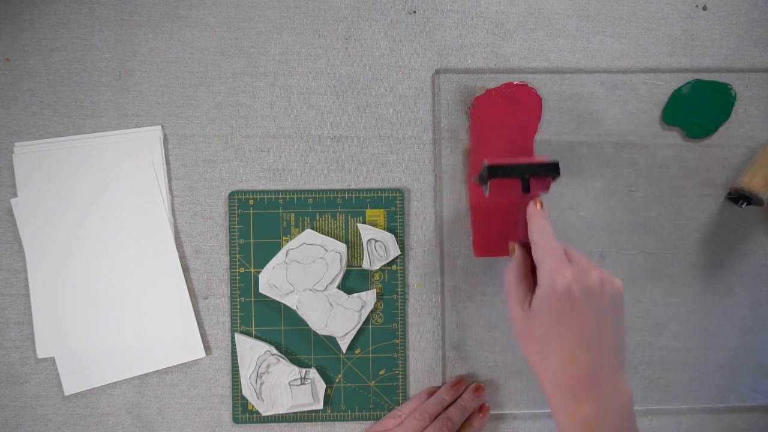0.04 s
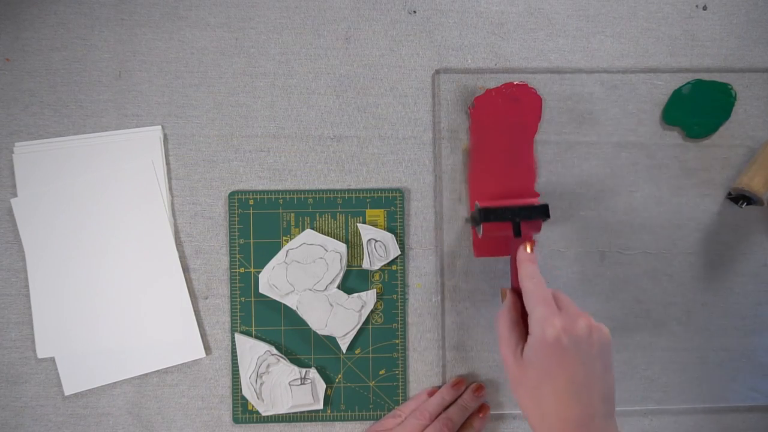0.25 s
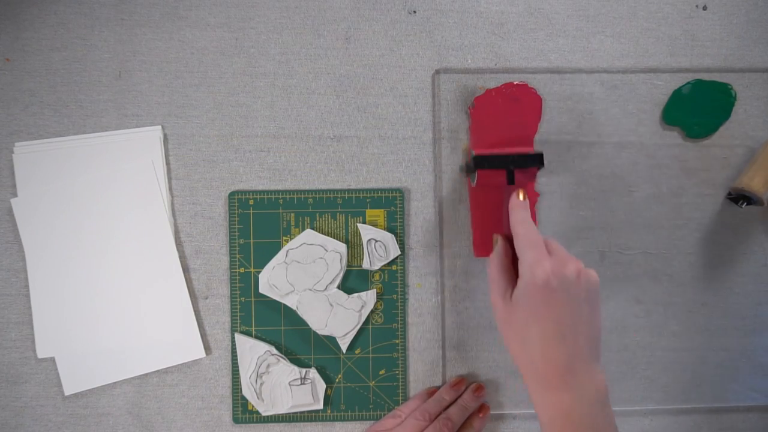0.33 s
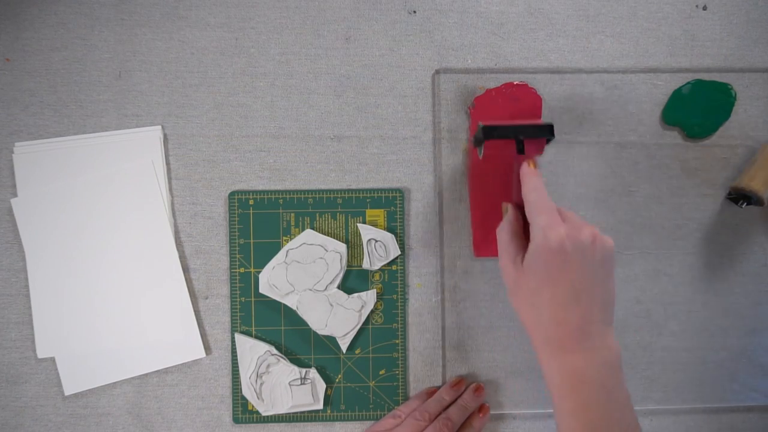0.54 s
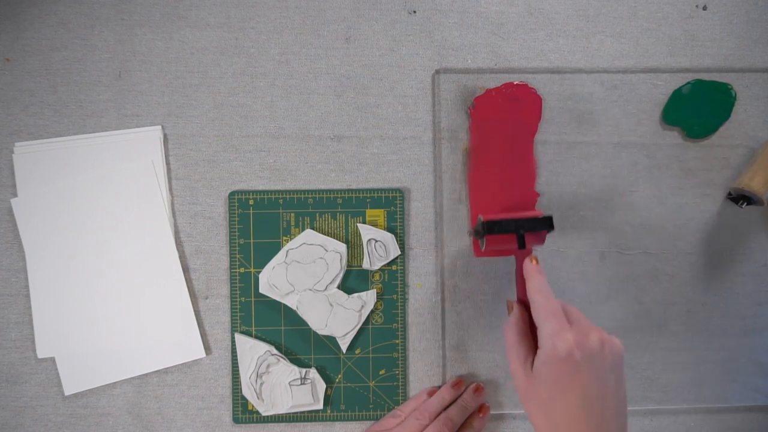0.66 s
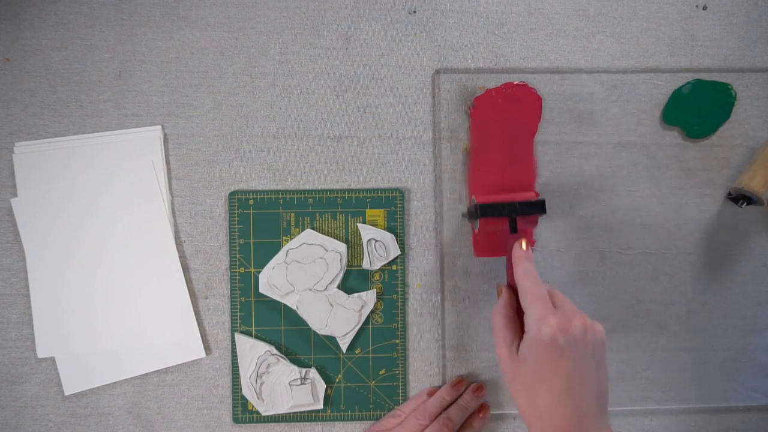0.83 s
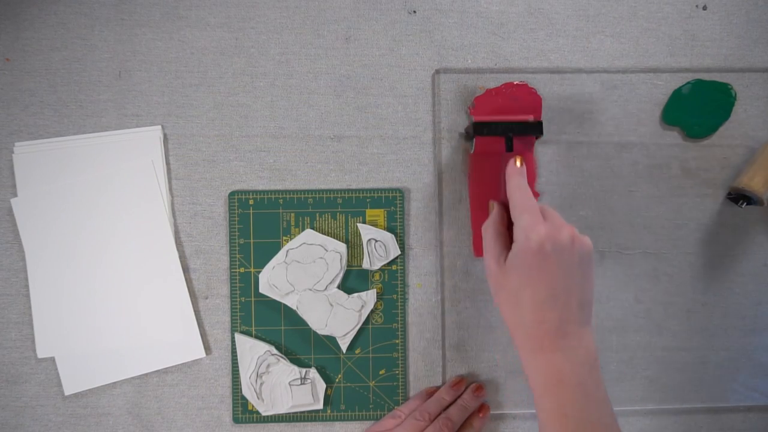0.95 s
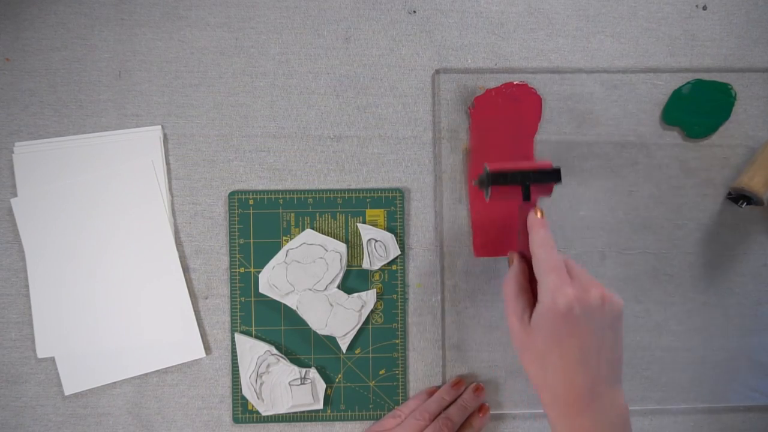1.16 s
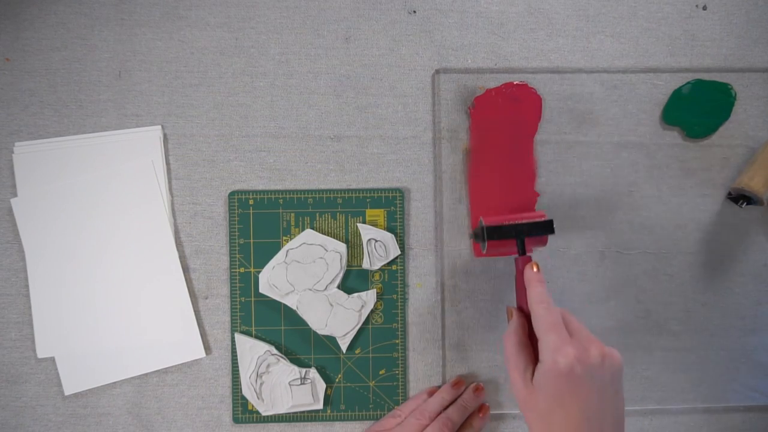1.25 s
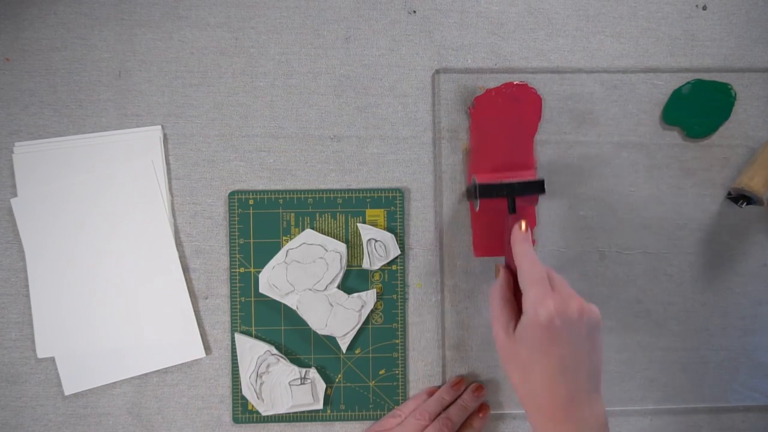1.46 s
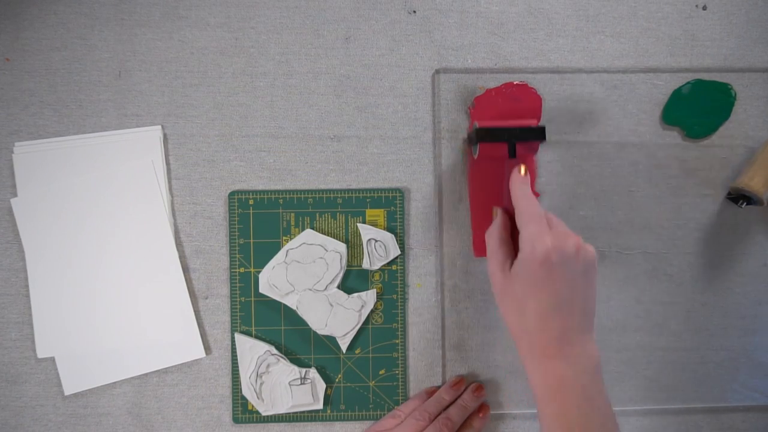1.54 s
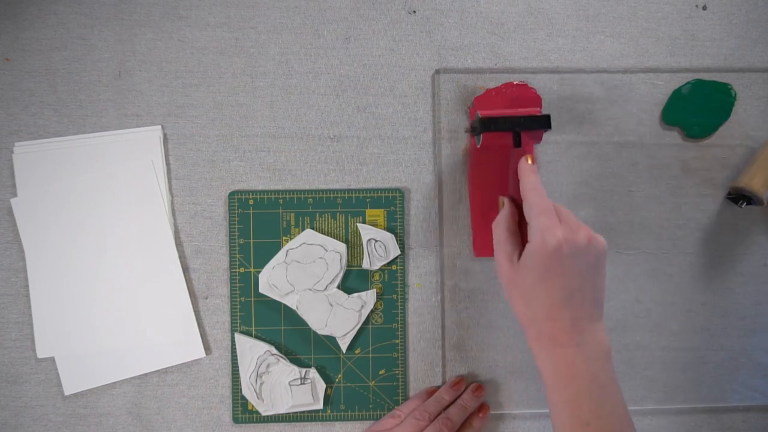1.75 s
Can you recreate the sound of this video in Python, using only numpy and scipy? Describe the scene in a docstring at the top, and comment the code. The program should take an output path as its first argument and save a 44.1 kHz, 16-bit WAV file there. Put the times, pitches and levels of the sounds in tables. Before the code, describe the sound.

An ink roller strikes a smooth slab with loud, bright clacks and short hollow thumps at about 0.2, 0.75 and 1.36 seconds, the first heaviest. After each, a quiet sticky hiss with low rumble swells, peaking near 0.4, 1.0 and 1.6, then stops, with small axle ticks at lift-off. Faint swishes precede landings, a tiny squeak near 1.2. Close, small room, short reverberation, low background noise.

```python
"""A rubber hand roller spreads sticky ink on a slab lying on a table, three strokes in a small room.
Over the quiet noise floor the arm swings back with a faint swish (filtered noise), once with a soft squeak.
Each landing thumps the slab (damped modes), and the axle clacks in its frame just after (a noise burst).
The ink then hisses as the roller is pushed along (random snaps) over a low rumble, and the loose axle
ticks, mostly as the roller lifts off."""
import sys
import numpy as np
from scipy import signal
from scipy.fft import rfft, irfft, next_fast_len
from scipy.io import wavfile
from scipy.ndimage import uniform_filter1d

SR = 44100
rng = np.random.default_rng(int(sys.argv[2]) if len(sys.argv) > 2 else 0)


def transcribe(u):
    """Save the signal u as a 16-bit wav file named by the first command-line argument.

    u: samples, shape (n,) or (channels, n), limited to [-1, 1]; the rate is SR.
    q: integer samples, one column per channel.
    """
    v = np.clip(np.atleast_2d(u).T, -1, 1)
    q = np.round(v * 32767).astype(np.int16)
    wavfile.write(sys.argv[1], SR, q)


N = 79380
RING_T = np.arange(SR // 2) / SR  # time since a blow (s)

# spectrum of the background noise: frequency_hz, level_db
FLOOR_COLOUR = [(20, -4.5), (35, -8.5), (52, -1), (66, -17.5), (85, -10), (115, -13.5), (170, -15.5),
                (220, -14.5), (265, -7.5), (320, -18), (600, -22.5), (950, -25), (1800, -32), (3400, -37.5),
                (6700, -40), (15500, -51.5)]
FLOOR_DB = -49

# swings of the arm back: centre_s, half_length_s, level_db
RETURNS = [(0.125, 0.037, -60), (.675, 0.042, -60), (1.25, 0.044, -56.5)]
# spectrum of the swish: frequency_hz, level_db
SWISH_COLOUR = [(300, -18.5), (1400, 2), (2400, -1.5), (3400, -4), (5000, -5), (8500, -15), (15000, -17)]
SQUEAK_S, SQUEAK_HALF_S, SQUEAK_HZ, SQUEAK_WIDTH_HZ, SQUEAK_DB = 1.222, 0.0089, 3360, 120, -53

# the roller lands: start_s, thump_db, contact_brightness_hz, hollow_ring_db, slap_db, axle_lag_s,
# clack_db, rattle_length_s, frame_ring_db, clack_midrange_db, handle_knock_db, clack_brightness_hz
LANDINGS = [(.2020, -5.5, 750, -6.5, -12, .0016, -8, 0.0023, 4.5, -4.5, 0.5, 16000),
            (0.754, -11, 700, -14, -24.5, 0.0013, -9.5, 0.004, -18.5, 9, 1, 16500),
            (1.3646, -11, 540, 5.5, -28.5, .0025, -8, 0.0019, -3, -9, -1.5, 13200)]
# modes of slab and table: frequency_hz, level_db, t60_s
SLAB_MODES = [(84.8, -17.5, 0.56), (103.2, -20, 0.37), (138.1, -15.5, .24), (170.3, -8, 0.18),
              (203.7, -13.5, .24), (261, -30.5, 0.25), (390, -17, .15), (426.4, -13.5, 0.22),
              (480, -26, 0.32), (550, -20.5, 0.18), (630, -23.5, 0.23), (641, -26.5, 0.42)]
# modes that ring more or less with the landing spot: frequency_hz, level_db, t60_s
HOLLOW_MODES = [(257.6, -17.5, 0.26), (304.7, -15, .28), (344, -8.5, .13), (360, -4.5, .12),
                (774, -27, 0.23), (835, -28.5, 0.25)]
# modes of rubber meeting ink: frequency_hz, level_db, t60_s
SLAP_MODES = [(466, 2.5, 0.025), (944, -12.5, 0.0089)]
HEAVE_HZ, HEAVE_DB, HEAVE_T60_S = 250, 2, 0.012  # the first, quickly damped heave of the slab
SLAB_BUILD_S = 0.0019  # time constant with which the slab's ringing builds up
PULSE_SIZE = 2048  # length of the short sounds (samples)

# modes of the roller frame: frequency_hz, level_db, t60_s
FRAME_MODES = [(4790, -30.5, .03), (5170, -16.5, .018), (5790, -8, .015), (8060, -7, 0.0098),
               (8303, -3, 0.016)]
# modes of the handle's hollow knock: frequency_hz, level_db, t60_s
HANDLE_MODES = [(1380, -21.5, 0.035), (1513, -9, 0.031), (1861, -14.5, 0.026)]
# spectrum of the clack: frequency_hz, level_db
CLACK_COLOUR = [(200, -13), (1080, -22.5), (1500, -1), (2400, -5.5), (3700, -7.5), (5300, 3), (7100, -4.5),
                (8300, 4.5), (10000, -6), (14500, -7), (16500, -3.5)]
CHATTER_T60_S, MIDRANGE_HZ, MIDRANGE_WIDTH_HZ = 0.0071, 3700, 590

# pushes through the ink: start_s, fastest_s, end_s
PUSHES = [(.31, .425, .484), (.88, 1.015, 1.055), (1.50, 1.615, 1.657)]
# spectrum of the ink hiss: frequency_hz, level_db
INK_COLOUR = [(300, -4), (700, -12.5), (1400, -9.5), (2600, -16), (4500, -14.5), (7200, -9), (8300, -3.5),
              (9100, -5.5), (10300, -15), (12200, -4.5), (14200, -3), (15700, -6)]
INK_DB, START_DB, END_DB = -44, -16.5, -2  # hiss when fastest; change at both ends of a push
STOP_DB_PER_S = 700  # added fall once a push has ended
THREADS_PER_S, THREAD_SPREAD_DB = 5300, 1
CRACKLE_PER_S, CRACKLE_DB = 79, -14  # thicker threads snap on their own; level against the hiss
# spectrum of the rumble under the ink: frequency_hz, level_db
RUMBLE_COLOUR = [(30, -16), (80, -4.5), (180, 3), (225, -5), (268, 2.5), (310, -9.5), (450, -15),
                 (700, -19), (2000, -31)]
RUMBLE_DB, RUMBLE_GROWTH = -2, 0.46  # level against the hiss; dB of rumble per dB of hiss

# the axle ticks in its play, mostly at lift-off: start_s, tick_db, brightness_hz, length_s,
# frame_ring_db, handle_knock_db, thump_db
TICKS = [(.3232, -43.5, 15000, 0.00034, -13, -20.5, -37.5), (.4936, -40, 4740, 0.0039, -14, 12, -44),
         (.5058, -35, 3500, 0.0024, -29, 5, -34.5), (.5455, -48, 1730, 0.0011, -34, -2, -40.5),
         (1.0753, -46, 3300, 0.0019, -5, 7.5, -35.5), (1.1075, -49, 10100, 0.0013, -0.5, 8, -36),
         (1.6688, -49, 15000, .0005, -13, -18.5, -54.5), (1.7033, -38, 6070, 0.00093, 5.5, 0.5, -34),
         (1.741, -57, 2000, 0.017, -28.5, 8, -37)]
TICK_LOW_HZ = 1100  # a tick is weak below this
# modes of the slab, released: frequency_hz, level_db, t60_s
BUMP_MODES = [(108.4, -3.5, 0.15), (133, 3, 0.12), (170.3, -7, 0.23), (243, -15, 0.34), (360, -7, 0.12),
              (396, -17, 0.13), (670, -14, 0.057)]

# decay of the room: frequency_hz, t60_s
ROOM_T60 = [(100, 0.28), (400, 0.45), (1500, 0.54), (5000, 0.38), (9000, 0.36), (15000, 0.18)]
# spectrum of the room's tail: frequency_hz, level_db
ROOM_COLOUR = [(60, 4), (200, -16.5), (600, -6), (1500, -16), (4500, -11), (8300, -17.5), (11000, -8),
               (15000, -18.5)]
EARLY_DB, EARLY_T60_S, WALL_DELAY_S = -14.5, 0.054, 0.004
CLACK_ROOM_DB, THUMP_ROOM_DB, TICK_ROOM_DB, INK_ROOM_DB = -0.5, 5, -1.5, -8  # sent to the room
SCATTER_HZ = 550  # the room hears the clack from all sides, which evens its spectrum over this width

LOW_CUT_HZ = 72
CLIP_TOP, TOP_HZ = 1.1, 15800  # recorder: overload ceiling (amplitude) and band limit


def amp(db):
    """Amplitude ratio: twenty decibels make a factor of ten."""
    return 10 ** (np.asarray(db) / 20)


def unit(x):
    """Normalisation to an rms of 1."""
    return x / np.sqrt(np.mean(x ** 2) + 1e-20)


def along(points, hz):
    """Interpolation of (frequency, value) points along a logarithmic frequency axis."""
    point_hz, value = np.transpose(points)
    return np.interp(np.log(hz + 1), np.log(point_hz + 1), value)


def filtered(x, response):
    """Linear filtering: the spectrum is multiplied by a response of frequency."""
    size = next_fast_len(len(x) + SR // 4)
    hz = np.fft.rfftfreq(size, 1 / SR)
    return irfft(rfft(x, size) * response(hz), size)[:len(x)]


def noise(colour_db, size=N):
    """Coloured noise: white noise shaped by a spectrum in dB, with an rms of 1."""
    padded = next_fast_len(size)
    hz = np.fft.rfftfreq(padded, 1 / SR)
    spectrum = rfft(rng.standard_normal(padded)) * amp(colour_db(hz))
    return unit(irfft(spectrum, padded)[:size])


def add(track, s, sound):
    """Superposition: a sound is summed into the track from time s on."""
    i = round(s * SR)
    track[i:i + len(sound)] += sound[:N - i]


def fade(t, t60):
    """Exponential decay: the amplitude falls by 60 dB in t60 seconds."""
    return np.exp(-np.log(1000) * np.maximum(t, 0) / t60)


def ring(modes, bright_hz=np.inf, size=None):
    """Modal superposition: damped sines, the high ones weakened by a soft contact."""
    t = RING_T[:size]
    total = np.zeros(len(t))
    for hz, db, t60 in modes:
        strength = amp(db) / np.hypot(1, hz / bright_hz)
        total += strength * np.sin(2 * np.pi * hz * t) * fade(t, t60)
    return total


def roll_off(ratio, order):
    """Low-pass roll-off: loss in dB as a frequency passes a corner."""
    return -10 * np.log10(1 + ratio ** order)


def noise_floor():
    """Stationary noise: a steady random background with a fixed spectrum."""
    return amp(FLOOR_DB) * noise(lambda hz: along(FLOOR_COLOUR, hz))


def swell(centre_s, half_s, db):
    """Gaussian envelope: a level that rises and falls smoothly about its centre."""
    t = np.arange(N) / SR
    return amp(db) * np.exp(-0.5 * ((t - centre_s) / half_s) ** 2)


def return_swishes():
    """Broadband noise: the arm swishes as it draws the roller back."""
    envelope = sum(swell(*row) for row in RETURNS)
    return noise(lambda hz: along(SWISH_COLOUR, hz)) * envelope


def squeak():
    """Narrow-band noise: energy close to one frequency makes a soft squeak of the roller."""
    resonance = lambda hz: -20 * np.log10(1 + ((hz - SQUEAK_HZ) / SQUEAK_WIDTH_HZ) ** 2)
    return noise(resonance) * swell(SQUEAK_S, SQUEAK_HALF_S, SQUEAK_DB)


def axle(length_s, colour_db, frame_db, handle_db):
    """Impact excitation: the axle chatters in its holes for a moment and rings frame and handle."""
    burst = noise(colour_db, size=PULSE_SIZE)
    chatter = burst * fade(RING_T[:PULSE_SIZE] - length_s, CHATTER_T60_S)
    frame = amp(frame_db) * ring(FRAME_MODES, size=PULSE_SIZE)
    handle = amp(handle_db) * ring(HANDLE_MODES, size=PULSE_SIZE)
    return chatter + frame + handle


def scattered(x, size=128):
    """Spectral averaging: a short pulse keeps the energy and broad colour of x."""
    width = max(3, int(SCATTER_HZ * len(x) / SR))
    power = uniform_filter1d(np.abs(rfft(x)) ** 2, width)
    pulse = irfft(np.sqrt(np.abs(power)))
    return np.roll(pulse, size)[:2 * size] * np.hanning(2 * size)


def room(x):
    """Reverberation: convolution with early reflections and a tail that decays by frequency."""
    hz, t, z = signal.stft(rng.standard_normal(len(RING_T)), SR, nperseg=256)
    decay = fade(t, along(ROOM_T60, hz)[:, None])
    tail = signal.istft(z * decay, SR, nperseg=256)[1]
    tail = filtered(tail / np.linalg.norm(tail), lambda f: amp(along(ROOM_COLOUR, f)))
    early = rng.standard_normal(len(tail)) * fade(np.arange(len(tail)) / SR, EARLY_T60_S)
    early = amp(EARLY_DB) * early / np.linalg.norm(early)
    answer = signal.fftconvolve(x, tail + early)
    return np.pad(answer, (round(WALL_DELAY_S * SR), 0))


def landings():
    """Impact and resonance: rubber slaps and heaves the slab, whose ringing builds up; the axle follows."""
    out = np.zeros(N)
    hollow = ring(HOLLOW_MODES)
    build = 1 - np.exp(-RING_T / SLAB_BUILD_S)
    heave = ring([(HEAVE_HZ, HEAVE_DB, HEAVE_T60_S)], size=PULSE_SIZE)
    for (s, thump_db, contact_hz, hollow_db, slap_db, lag_s, clack_db, rattle_s,
         frame_db, mid_db, handle_db, bright_hz) in LANDINGS:
        slab = (ring(SLAB_MODES, contact_hz) + amp(hollow_db) * hollow) * build
        slap = amp(slap_db) * ring(SLAP_MODES, size=PULSE_SIZE)
        thump = slap + amp(thump_db) * heave

        def colour(hz):
            midrange = mid_db * np.exp(-((hz - MIDRANGE_HZ) / MIDRANGE_WIDTH_HZ) ** 2)
            return along(CLACK_COLOUR, hz) + midrange + roll_off(hz / bright_hz, order=10)

        clack = amp(clack_db) * axle(rattle_s, colour, frame_db, handle_db)
        add(out, s, thump)
        add(out, s, amp(thump_db) * slab)
        add(out, s, amp(THUMP_ROOM_DB) * room(thump))
        add(out, s, amp(CLACK_ROOM_DB) * room(scattered(clack)))
        add(out, s + lag_s, clack)
    return out


def ink_threads():
    """Shot noise: countless ink threads snap at random, and thicker ones crackle on their own."""
    strength = rng.standard_normal(N) * amp(THREAD_SPREAD_DB * rng.standard_normal(N))
    snaps = (rng.random(N) < THREADS_PER_S / SR) * strength
    crackle = (rng.random(N) < CRACKLE_PER_S / SR) * rng.standard_normal(N)
    mixed = unit(snaps) + amp(CRACKLE_DB) * unit(crackle)
    return unit(filtered(mixed, lambda hz: amp(along(INK_COLOUR, hz))))


def rolling():
    """Rate-dependent excitation: hiss behind the roller grows with speed, over the rumble of the slab."""
    t = np.arange(N) / SR
    hiss, rumble = np.zeros(N), np.zeros(N)
    for start, fastest, end in PUSHES:
        rising_db = START_DB * ((fastest - t) / (fastest - start)) ** 2
        slowing_db = END_DB * ((t - fastest) / (end - fastest)) ** 2
        speed_db = np.where(t < fastest, rising_db, slowing_db)
        speed_db = speed_db - STOP_DB_PER_S * np.maximum(t - end, 0)
        hiss += amp(INK_DB + speed_db)
        rumble += amp(INK_DB + RUMBLE_DB + RUMBLE_GROWTH * speed_db)
    roll = hiss * ink_threads() + rumble * noise(lambda hz: along(RUMBLE_COLOUR, hz))
    return roll + amp(INK_ROOM_DB) * room(roll)[:N]


def ticks():
    """Impact in a loose joint: light knocks of the axle, each with a soft bump of the slab."""
    out, to_room = np.zeros(N), np.zeros(N)
    bump = ring(BUMP_MODES) * (1 - np.exp(-RING_T / SLAB_BUILD_S))
    for s, db, bright_hz, length_s, frame_db, handle_db, thump_db in TICKS:

        def colour(hz):
            return roll_off(hz / bright_hz, order=6) + roll_off(TICK_LOW_HZ / (hz + 1), order=4)

        tick = amp(db) * axle(length_s, colour, frame_db, handle_db)
        add(out, s, tick)
        add(out, s, amp(thump_db) * bump)
        add(to_room, s, scattered(tick))
    return out + amp(TICK_ROOM_DB) * room(to_room)[:N]


def low_cut(x):
    """High-pass filtering: the microphone picks up little of the strokes' deepest bass."""
    return signal.sosfilt(signal.butter(2, LOW_CUT_HZ, 'high', fs=SR, output='sos'), x)


def scene():
    """Superposition: the strokes sound over the quiet room."""
    strokes = low_cut(landings() + rolling() + ticks())
    return (noise_floor() + return_swishes() + squeak() + strokes)[None]


def record(dry):
    """Saturation and band limiting: the clacks just overload the recorder, which cuts the top treble."""
    clipped = dry[0] / (1 + (dry[0] / CLIP_TOP) ** 8) ** (1 / 8)
    return filtered(clipped, lambda hz: 1 / np.hypot(1, (hz / TOP_HZ) ** 120))[None]


dry = scene()
out = record(dry)
transcribe(out)
```